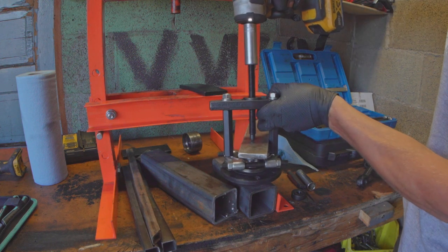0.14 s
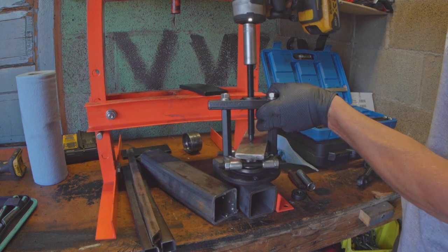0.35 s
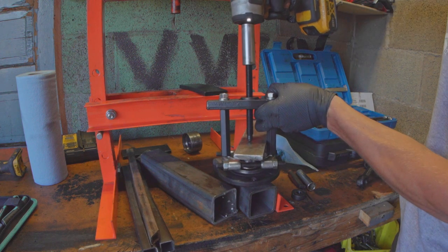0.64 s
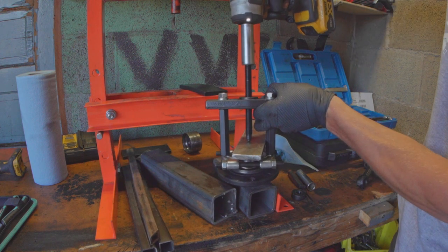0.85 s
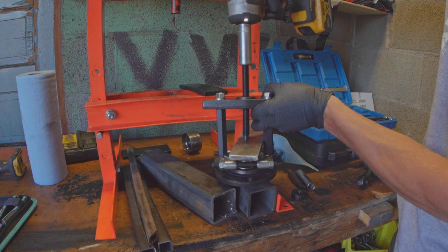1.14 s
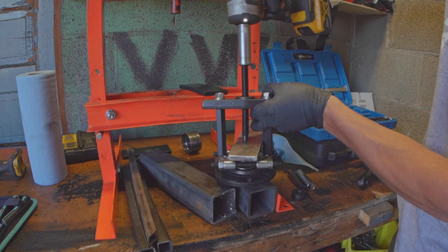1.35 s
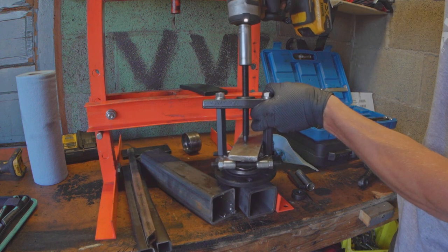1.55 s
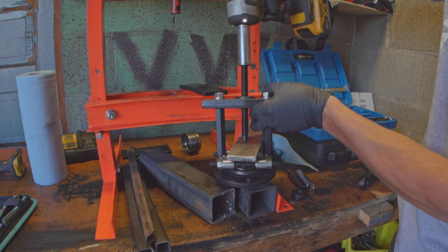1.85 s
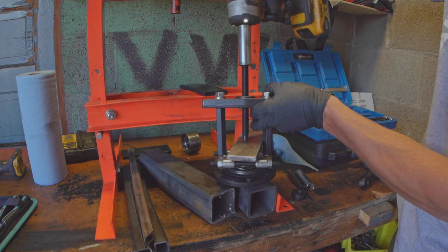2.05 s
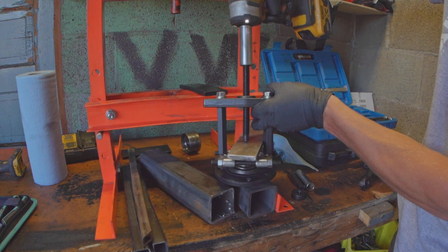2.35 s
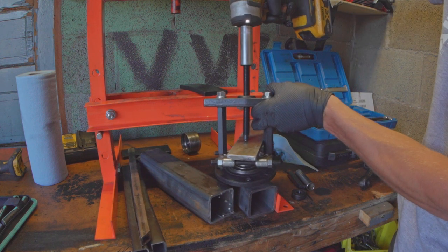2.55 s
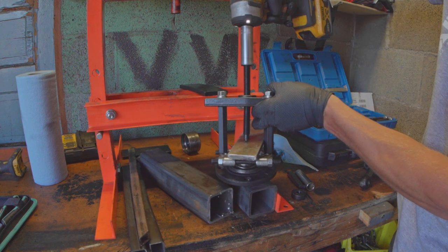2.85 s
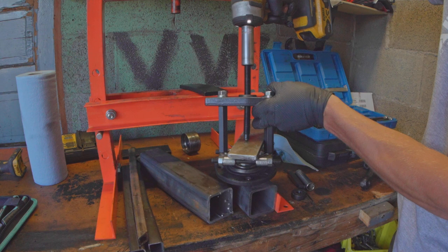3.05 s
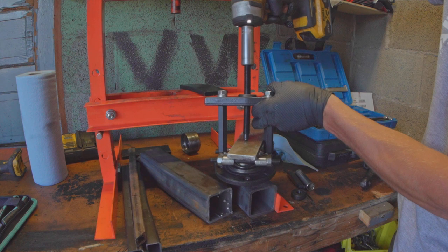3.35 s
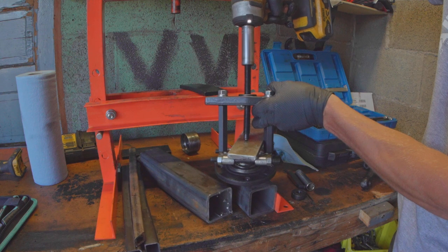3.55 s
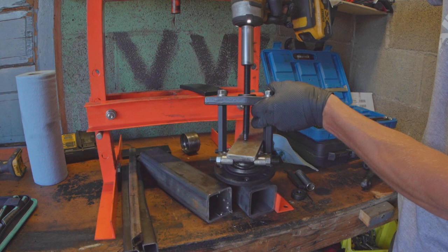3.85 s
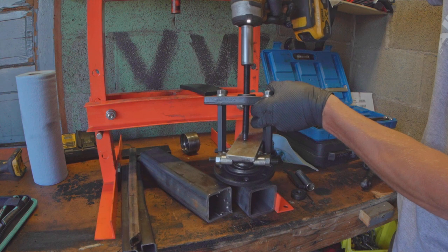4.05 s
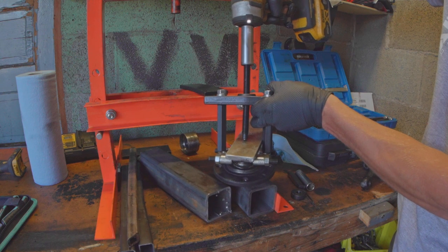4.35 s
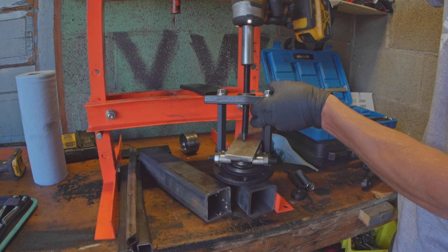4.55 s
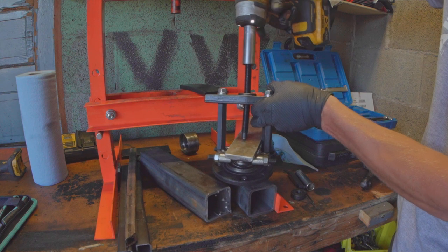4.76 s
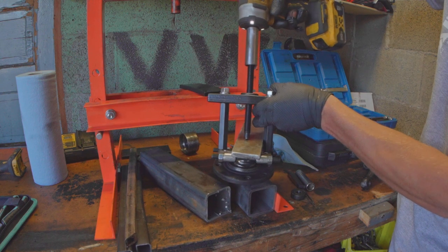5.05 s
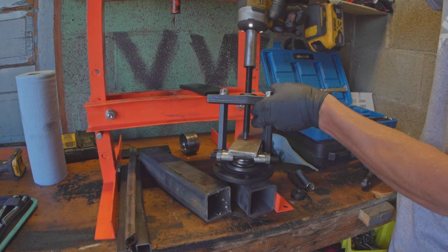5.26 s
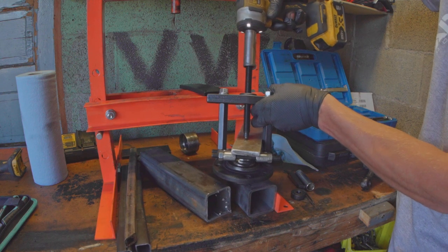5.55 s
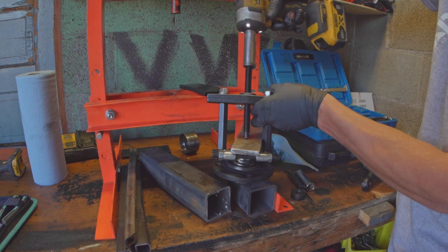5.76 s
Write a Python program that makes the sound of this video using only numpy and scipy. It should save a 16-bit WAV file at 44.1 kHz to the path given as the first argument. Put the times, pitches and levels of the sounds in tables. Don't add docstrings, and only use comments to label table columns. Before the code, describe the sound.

A cordless impact wrench hammers about fifty-five blows a second on a puller screw, steel ringing and rattling, then two short bursts finish.

```python
import sys
import numpy as np
from scipy import signal
from scipy.io import wavfile
from scipy.ndimage import uniform_filter1d, minimum_filter1d

SR = 44100
rng = np.random.default_rng(int(sys.argv[2]) if len(sys.argv) > 2 else 0)


def magnitude_from_level(level_db):
    exponent = np.asarray(level_db, float) / 20
    return 10 ** exponent


def wrap_up_sound(samples):
    columns = np.atleast_2d(samples).T
    tamed = np.clip(columns, -1, 1)
    steps = np.round(tamed * 32767).astype(np.int16)
    wavfile.write(sys.argv[1], SR, steps)


N = 261072

BANDS_HZ = 45 * 2 ** np.arange(0, 8.6, .3)
CENTRES_HZ = np.sqrt(BANDS_HZ[1:] * BANDS_HZ[:-1])


def rms_one(x):
    return x / np.sqrt(np.mean(x ** 2) + 1e-20)


def at_hz(points, hz):
    points = np.array(points)
    return np.interp(np.log(hz), np.log(points[:, 0]), points[:, 1])


def clicks(seconds, sizes):
    train = np.full(N, 1e-18)
    places = (np.asarray(seconds) * SR).astype(int)
    np.add.at(train, np.clip(places, 0, N - 1), sizes)
    return train


def fade(x, t60):
    return signal.lfilter([1], [1, -magnitude_from_level(-60 / (abs(t60) * SR))], x)


def burst(at, size, t60, rise_s):
    power = clicks(at, size ** 2)
    return np.sqrt(np.maximum(fade(power, t60 / 2) - fade(power, rise_s), 0))


def noise_bands(length):
    white = rng.standard_normal((2, length))
    bands = []
    for k, edges in enumerate(zip(BANDS_HZ, BANDS_HZ[1:])):
        band_pass = signal.butter(2, edges, "band", fs=SR, output="sos")
        bands.append(signal.sosfilt(band_pass, white[k % 2]))
    return bands


def coloured(spectrum):
    return rms_one(magnitude_from_level(at_hz(spectrum, CENTRES_HZ)) @ np.array(noise_bands(N)))


def dying_noise(at, level_db, spectrum, t60s, spread_db, rise_s):
    out = np.zeros(N)
    shared = rng.standard_normal(len(at))
    t60s = np.broadcast_to(t60s, len(CENTRES_HZ))
    for hz, t60, band in zip(CENTRES_HZ, t60s, noise_bands(N)):
        luck = 0.82 * shared + rng.standard_normal(len(at))
        size = magnitude_from_level(level_db + at_hz(spectrum, hz) + spread_db * luck)
        out += band * burst(at, size, t60, rise_s)
    return out


def struck(modes, at, level_db, spread_db, shake_s, shake, loss_db=None):
    out = np.zeros(N)
    for k, (hz, db, t60) in enumerate(modes):
        miss_db = 0 if loss_db is None else loss_db[k]
        luck_db = spread_db * rng.standard_normal(len(at))
        strike = clicks(at, magnitude_from_level(level_db + db - miss_db + luck_db))
        force = strike + shake * fade(strike, shake_s) * rng.standard_normal(N)
        r, w = magnitude_from_level(-60 / (t60 * SR)), 2 * np.pi * hz / SR
        out += signal.lfilter([0, np.sin(w)], [1, -2 * r * np.cos(w), r * r], force)
    return out


# (frequency [Hz], density [dB per Hz])
FLOOR = [(18, -29), (30, 15), (165, -15), (988, -21), (2120, -16), (4530, -35), (5310, -35), (16000, -41)]


def room_hum():
    return magnitude_from_level(-64) * coloured(FLOOR)


# (frequency [Hz], t60 [s])
SHOP_T60 = [(100, 0.17), (400, 0.24), (900, 0.25), (2500, 0.2), (6000, 0.18), (16000, 0.054)]


def workshop(x):
    t = np.arange(SR // 2) / SR
    echo = np.zeros(len(t))
    for hz, band in zip(CENTRES_HZ, noise_bands(len(t))):
        echo += band * magnitude_from_level(-60 * t / at_hz(SHOP_T60, hz))
    echo = echo * np.clip((t - .003) / 0.0014, 0, 1)
    return signal.fftconvolve(x, echo / np.sqrt(np.sum(echo ** 2)))[:N]


def dip_near_3k3(x):
    b, a = signal.iirnotch(3350, 3.5, fs=SR)
    return 0.47 * x + 0.42 * signal.lfilter(b, a, x)


# (time [s], peak [dB], direction and size [1])
POPS = [(0.227, -29, -1.2), (0.266, -26, -1.2), (0.406, -26, 1), (0.425, -30, -1.1), (0.551, -22, -0.83),
        (0.569, -26, 0.79), (0.659, -21.5, -0.84), (0.786, -15.5, 0.83), (0.861, -23, -1), (0.895, -25, -1),
        (1.004, -17, 0.71), (1.113, -27, -1), (1.184, -21.5, -0.86), (1.276, -27, 0.92), (1.929, -34, 1),
        (2.204, -27, 0.88), (2.241, -23, -1), (2.775, -24.5, -1.6), (3.656, -24.5, -1.05),
        (4.189, -30, 0.91), (5.155, -23.5, -0.77), (5.21, -25, 0.85), (5.492, -28, 1), (5.527, -24, -0.68),
        (5.636, -26, 1), (5.656, -19, -0.7), (5.675, -22, 1), (5.711, -24, -1.3), (5.73, -16.5, 0.91),
        (5.767, -28, -1.2)]


def pops():
    s, db, direction = np.transpose(POPS)
    step = np.cumsum(clicks(s, magnitude_from_level(db + 5) * direction))
    rounded = signal.sosfilt(signal.butter(2, 260, fs=SR, output="sos"), step)
    return signal.sosfilt(signal.butter(3, 30, "high", fs=SR, output="sos"), rounded)


# (time [s], peak [dB])
TICKS = [
    (.1554, -59),
    (4.8843, -39),
    (4.903, -38),
    (4.9681, -51),
    (5.26, -28),
    (5.2894, -39),
    (5.3084, -31),
    (5.33, -34),
    (5.349, -29),
    (5.368, -25),
]
# (frequency [Hz], density [dB per Hz])
TICK = [(300, -7), (1500, 5.5), (3500, -2), (6500, -10), (9000, -13), (12000, -7), (16000, -18)]


def ticks():
    s, db = np.transpose(TICKS)
    return dying_noise(s, db + 0.5, TICK, .015, spread_db=1.0, rise_s=.0004)


# (trigger [s], first blow [s], blows [count], time lost while the hammer gathers speed [ms])
BURSTS = [
    (-.3, .0022, 1, 0),
    (.168, .2062, 249, 5.2),
    (4.981, 5.0043, 14, 4.1),
    (5.37, 5.3965, 29, 2.8),
]
# (from time [s], gap between blows [ms])
PACE = [
    (0, 17.945),
    (.655, 18.13),
    (1.925, 18.43),
    (2.478, 18.367),
    (3.763, 18.494),
    (4.9, 18.41),
    (5.3, 18.375),
]
GATHER = .28


def blow_times():
    since, gap_ms = np.transpose(PACE)
    pulls = []
    for trigger, first, count, lost_ms in BURSTS:
        at = [first]
        for n in range(count - 1):
            pace_ms = gap_ms[np.searchsorted(since, at[-1]) - 1]
            late_ms = lost_ms * (1 - GATHER) * GATHER ** n
            at.append(at[-1] + (pace_ms + late_ms) / 1000)
        pulls.append(at)
    return pulls


# (frequency [Hz], density [dB per Hz])
WHIR = [(59, -46), (100, -27), (648, -6.5), (1830, -6.5), (2860, -13.5), (3470, -5), (5080, -25),
        (8460, -22), (15000, -23), (16000, -30)]
# (squeeze [s], whir at contact [dB], whir under load [dB])
PULLS = [
    (.01, -30, -25),
    (0.0092, -41, -35.5),
    (0.028, -52, -29.5),
    (0.012, -35, -32.5),
]
SPIN_UP_S, RUN_ON_S, BRAKE_S = 0.039, .021, 0.018
BRAKE_DB, COAST_DB_PER_S = 28, 200


def motor():
    t, gain = np.arange(N) / SR, np.zeros(N)
    for (trigger, *_), at, (squeeze_s, start_db, db) in zip(BURSTS, blow_times(), PULLS):
        off = at[-1] + RUN_ON_S
        braked, braked_db = off + BRAKE_S, db - BRAKE_DB
        s = [trigger - squeeze_s, trigger, trigger + SPIN_UP_S, off, braked, braked + 1]
        levels_db = [-72, start_db, db, db, braked_db, braked_db - COAST_DB_PER_S]
        gain += magnitude_from_level(np.interp(t, s, levels_db)) * (t > s[0])
    return gain * coloured(WHIR)


# (frequency [Hz], density [dB per Hz])
RATTLE = [(35, -42), (60, -15), (171, -20.5), (390, -1.5), (468, 0), (705, 2), (772, 0.5), (2260, 2.5),
          (3330, -3), (5250, -3), (8480, -20), (11700, -6), (14000, -23)]
# (frequency [Hz], t60 [s])
RATTLE_T60 = [(100, 0.54), (600, 0.11), (2000, 0.05), (5000, 0.049), (10000, 0.029), (16000, 0.047)]


def loose_steel(at, force):
    t60s = at_hz(RATTLE_T60, CENTRES_HZ)
    return dying_noise(at + 0.00078, force + 11, RATTLE, t60s, spread_db=1.13, rise_s=0.00085)


# (time [s], jaw pitch [Hz], plate pitch [Hz], narrow tube pitch [Hz], narrow tube level [dB])
SEATS = [(0, 6530, 2285, 655, -34), (.48, 4450, 2285, 644, -31), (1.0, 4450, 980, 708, -34),
         (1.3, 4450, 2285, 546, -31), (1.7, 6530, 2590, 600, -30), (2.1, 6530, 2590, 546, -32.5),
         (2.4, 5990, 1138, 708, -29.5), (2.65, 4060, 1138, 708, -34), (2.95, 7250, 1305, 708, -32.5),
         (3.3, 5550, 1138, 546, -28), (3.7, 5120, 1305, 686, -31), (3.95, 5120, 2590, 546, -27.5),
         (4.25, 4800, 845, 676, -29.5), (4.65, 4800, 2600, 708, -29.5), (5.0, 5990, 1810, 546, -43),
         (5.25, 6530, 1810, 708, -34), (5.4, 6530, 1305, 653, -31.5), (5.92, 6530, 1138, 660, -26.5)]


def favour(modes, at, index, db_per_octave, most_db):
    rows = np.array(SEATS)
    losses = []
    for hz, db, t60 in modes:
        octaves_away = np.abs(np.log2(hz / rows[:, index]))
        loss = np.minimum(db_per_octave * octaves_away, most_db)
        losses.append(np.interp(at, rows[:, 0], loss))
    return losses


# (frequency [Hz], level [dB], t60 [s])
WIDE_TUBE = [(108, -20, .25), (218, -22, .08), (326, -15, .07), (381, 1, .14), (420, -12, .08)]


def wide_tube(at, weight):
    return struck(WIDE_TUBE, at + 0.002267, 1.381 * weight + 20, spread_db=0.0, shake_s=0.02, shake=0.015)


# (frequency [Hz], level [dB], t60 [s])
NARROW_TUBE = [(546, -3, .045), (600, -3, .04), (655, 0, .04), (708, -3, .045)]


def narrow_tube(at):
    rows = np.array(SEATS)
    level = np.interp(at, rows[:, 0], rows[:, 4])
    seat = favour(NARROW_TUBE, at, index=3, db_per_octave=60, most_db=7)
    return struck(NARROW_TUBE, at + .007, 1.176 * level + 13, spread_db=3.5,
                  shake_s=0.014, shake=0.011, loss_db=seat)


# (frequency [Hz], level [dB], t60 [s])
PLATE = [(845, -7.5, 0.17), (980, 2, 0.074), (1141.5, 4, 0.074), (1305, 2, 0.084), (1810, 3.5, 0.04),
         (2285, 2, 0.053), (2625, -8, 0.17)]


def plate(at, force):
    seat = favour(PLATE, at, index=2, db_per_octave=40, most_db=6)
    return struck(PLATE, at, force - 6.5, spread_db=3.0, shake_s=0.019, shake=0.061, loss_db=seat)


# (frequency [Hz], level [dB], t60 [s])
FRAME = [(3820, -6, 0.087), (9200, -10, .05), (10500, -10, 0.14), (11900, -4, .04), (14890, -11, 0.18)]


def frame(at, force):
    return struck(FRAME, at, force - 23, spread_db=3.0, shake_s=0.032, shake=0.21)


# (frequency [Hz], level [dB], t60 [s])
JAWS = [(4060, -4.5, 0.055), (4450, 1, 0.025), (4800, -0.5, 0.026), (5120, 6, 0.011), (5550, 4.5, 0.014),
        (5990, -2.5, 0.025), (6530, 2.5, 0.013), (7250, -2, 0.025)]
# (time [s], loss [dB])
LOOSE_JAWS = [
    (0, 7),
    (.2, 14),
    (.8, 13),
    (1.3, 0),
]


def jaws(at):
    level = -27.5 - np.interp(at, *np.transpose(LOOSE_JAWS))
    grip = favour(JAWS, at, index=1, db_per_octave=85, most_db=14)
    return struck(JAWS, at, level, spread_db=1.5, shake_s=0.023, shake=0.24, loss_db=grip)


# (frequency [Hz], level [dB], t60 [s])
SCREW = [(2676, 0, .22), (6232, -7, .12), (6700, -12, .08)]


def puller_screw(at, force, tension):
    return struck(SCREW, at, force + 1.38 * tension + 3, spread_db=1.5, shake_s=0.039, shake=0.04)


# (frequency [Hz], width [Hz], level [dB])
SOCKET = [(14840, 360, 0), (15200, 600, -3), (15650, 600, -5)]


def socket(at, level_db):
    out = np.zeros(N)
    shared = np.tanh(np.diff(rng.standard_normal(len(at) + 1), 2, prepend=0))
    for hz, width, db in SOCKET:
        r = np.exp(-np.pi * width / SR)
        poles = [1, -2 * r * np.cos(2 * np.pi * hz / SR), r * r]
        once = signal.lfilter([1 - r], poles, rng.standard_normal(N))
        twice = signal.lfilter([1 - r], poles, once)
        size = magnitude_from_level(level_db + db + 4.5 * shared + 1.2 * rng.standard_normal(len(at)))
        out += rms_one(twice) * burst(at + 0.0013, size, t60=0.044, rise_s=0.016)
    return out


# (frequency [Hz], density [dB per Hz])
CLATTER = [(500, -19), (1200, -2.5), (2400, -4), (3300, 2), (5000, -7), (6800, -5), (8500, -13.5),
           (12000, -13.5), (16000, -21)]


def clatter(at, force):
    return dying_noise(at + 0.0002, force + 11, CLATTER, .028, spread_db=1.0, rise_s=0.0051)


# (frequency [Hz], density [dB per Hz])
CRACK = [(300, -50), (1000, -5.5), (3000, -6), (6000, -5.5), (10000, -10.5), (13000, 5), (16000, -58)]
SEATED_DB = -27.5


def crack(at, force, seated):
    level = -4.5 - 0.8 * (seated - SEATED_DB) + 0.23 * (force + 22)
    return dying_noise(at, level, CRACK, .007, spread_db=0.3, rise_s=0.0003)


# (time [s], force [dB], screw tension [dB], socket seating [dB], weight on the bench [dB])
GRIP = [(0, -22.5, -24, -28, -32.5), (.21, -20.5, -28, -32.5, -35.5), (.55, -20.5, -29, -37.5, -36),
        (.9, -21.5, -7, -30, -35.5), (1.35, -21.5, -9.5, -27.5, -38.5), (1.8, -20, -3.5, -27, -38.5),
        (2.2, -20.5, -8, -26.5, -36.5), (2.5, -21.5, -15, -29, -35.5), (2.9, -23.5, -15, -30, -37),
        (3.4, -21, -21, -29.5, -34), (3.7, -21.5, -11, -27.5, -35.5), (4.2, -19.5, -13.5, -28.5, -33.5),
        (4.75, -22, -28, -26, -34.5), (5.0, -32.5, -20, -27, -44), (5.09, -21.5, -20, -32, -40),
        (5.25, -37, -20, -25, -62), (5.4, -29, -23, -31, -39.5), (5.92, -25, -11, -24.5, -37)]


def hammer():
    at = np.concatenate(blow_times())
    at = at + .0001 * rng.standard_normal(len(at))
    s, *held = np.transpose(GRIP)
    force, tension, seated, weight = [np.interp(at, s, column) for column in held]
    tool = crack(at, force, seated) + clatter(at, force) + socket(at, seated + 7)
    rings = puller_screw(at, force, tension) + jaws(at) + frame(at, force)
    rings += plate(at, force) + wide_tube(at, weight) + narrow_tube(at)
    rings = signal.sosfilt(signal.butter(2, 85, "high", fs=SR, output="sos"), rings)
    return tool, rings, loose_steel(at, force)


def scene():
    parts = [*hammer(), motor() + ticks()]
    near = sum(part + magnitude_from_level(-12.5) * workshop(part) for part in parts)
    return (dip_near_3k3(near) + room_hum())[None]


def limiter(x):
    limit = .27
    peak = uniform_filter1d(-minimum_filter1d(-np.abs(x), size=90), size=60)
    return x / (1 + (peak / limit) ** 4) ** .2


def top_cut(x):
    return signal.sosfilt(signal.butter(12, 17060, fs=SR, output="sos"), x)


def record(dry):
    rounded = .36 * np.tanh((limiter(dry) + pops()) / .36)
    low_pass = signal.ellip(12, 1, 70, 15800, fs=SR, output="sos")
    cut = signal.sosfilt(low_pass, rounded)
    return top_cut(cut)


dry = scene()
out = record(dry)
wrap_up_sound(out)
```